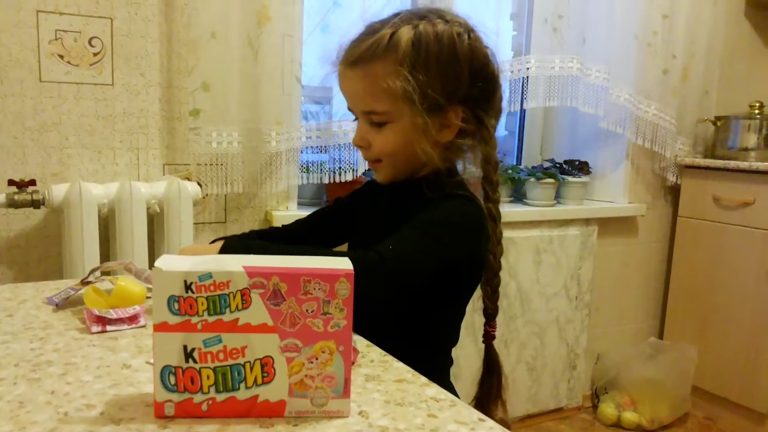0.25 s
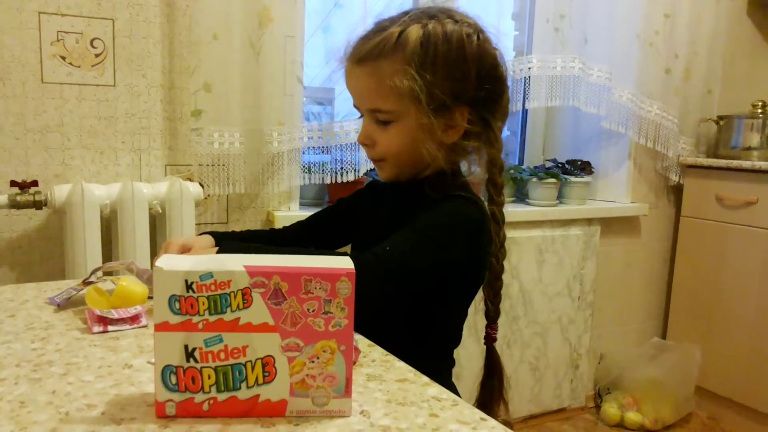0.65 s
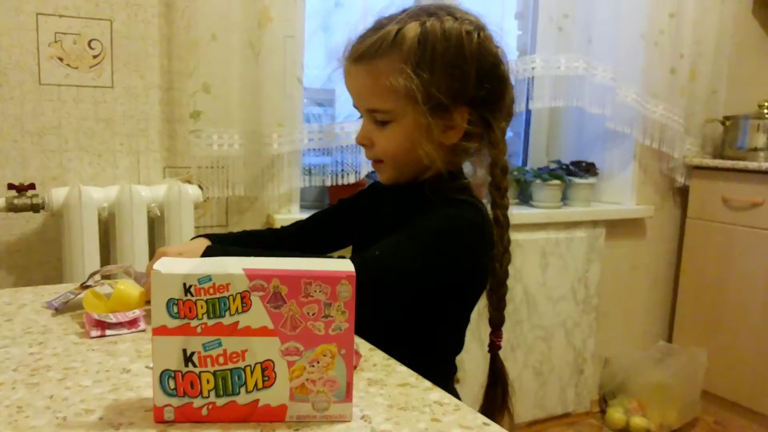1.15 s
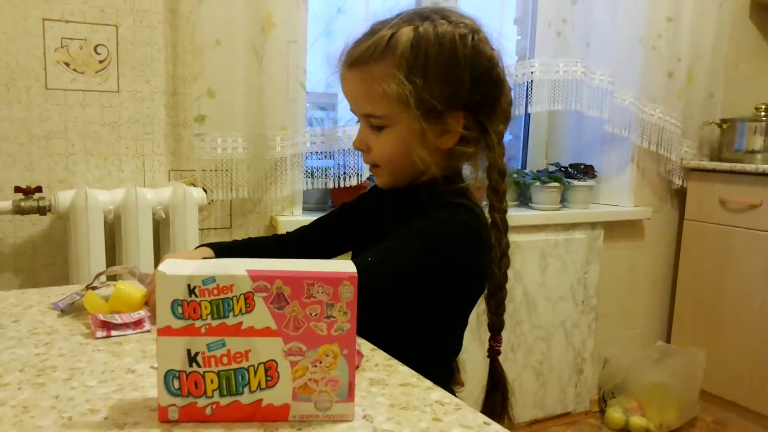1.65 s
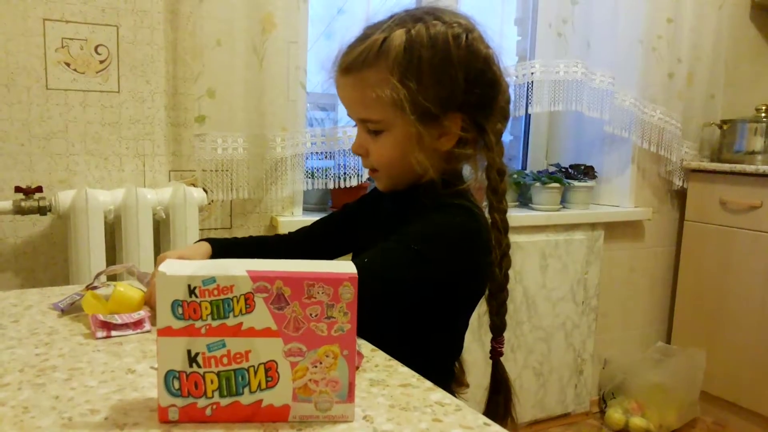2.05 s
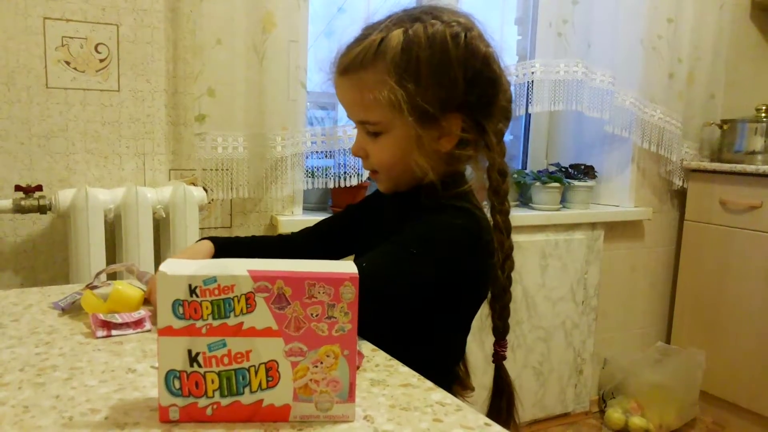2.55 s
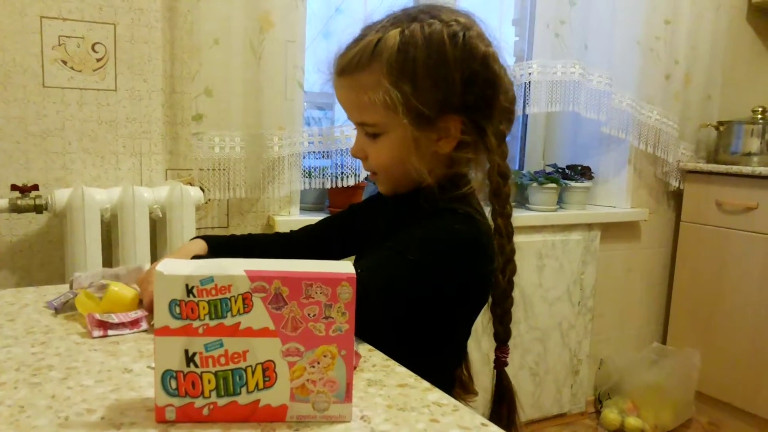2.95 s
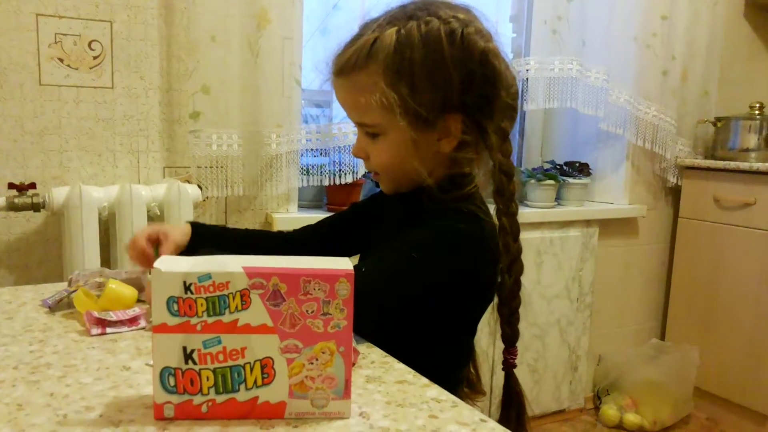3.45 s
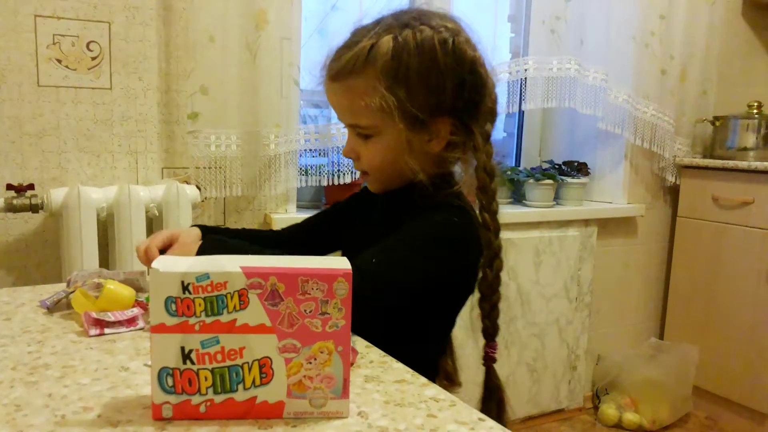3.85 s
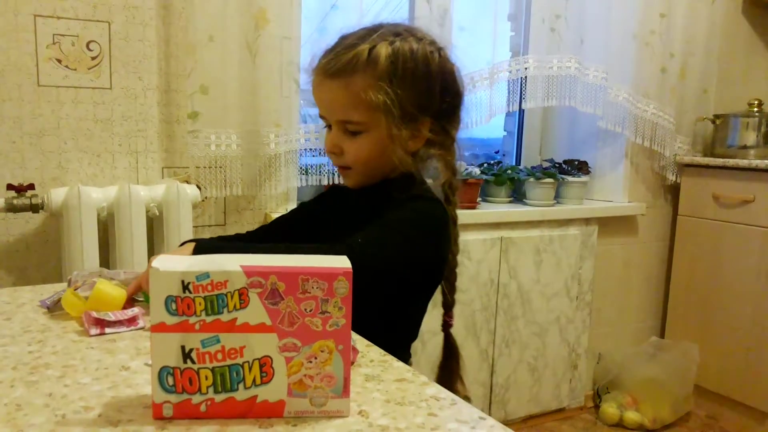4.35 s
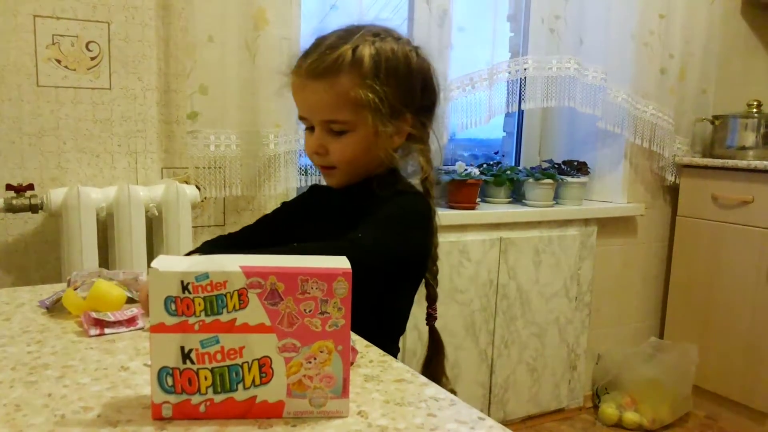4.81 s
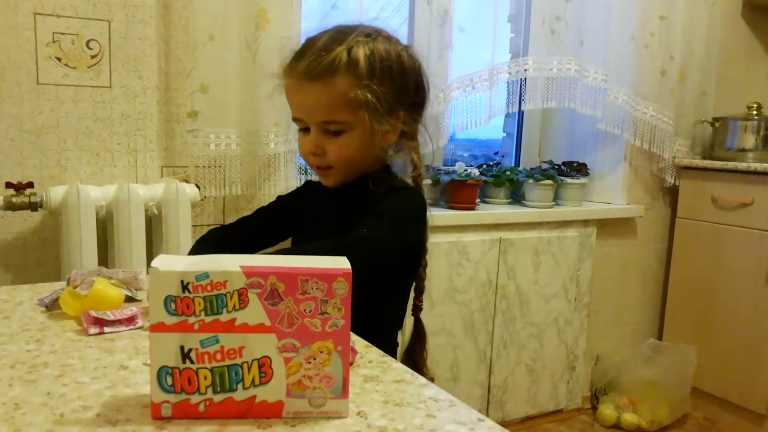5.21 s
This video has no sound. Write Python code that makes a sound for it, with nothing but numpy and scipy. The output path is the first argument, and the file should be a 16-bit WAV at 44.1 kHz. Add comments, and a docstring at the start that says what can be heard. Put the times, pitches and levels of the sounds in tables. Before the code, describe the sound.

In a small, hard kitchen, light hollow plastic toy pieces are turned, knocked together and set down on a table. From 0 to 1 second there are soft, scattered ticks and a faint slide, slightly firmer near 0.45. Clicks around 1.05, 1.5 and 1.8 are clearer, with small rattles and gaps between. A stronger clack comes at 2.3, then denser handling from 2.5 to 3.2. A hard knock at 3.3 leads to the sharpest, brightest cracks near 3.57, followed by quick taps until 3.8. After a short lull, a tight cluster strikes at 4.15 to 4.3, and more clacks at 4.65 to 4.8. Sliding and rattling are fuller around 4.9 to 5.2, then tiny taps end softly near 5.5. Rings are very short, with a brief bright room tail. Quiet hiss and low, wandering rumble continue throughout, the deepest part thinner after 2.7.

```python
"""Small hollow plastic toy pieces are turned, knocked together and set down on a kitchen table.
The first knocks are soft and sparse; they grow louder and denser, are hardest from about 3.3 to 4.8 s,
and end softly. Each knock chatters for a few milliseconds and rings the short modes of the pieces.
Slides and rattles come and go between and under the knocks, made of many tiny contacts with the same modes.
A small hard room answers with dense reflections, over steady hiss and a low, wandering household rumble."""
import sys
import numpy as np
from scipy import signal
from scipy.fft import rfft, irfft
from scipy.io import wavfile

SR = 44100
rng = np.random.default_rng(int(sys.argv[2]) if len(sys.argv) > 2 else 0)


def persist_wave(psi):
    """Save psi, clipped to +-1, as 16-bit WAV."""
    counts = np.round(np.clip(psi, -1, 1) * 32767).astype(np.int16)
    wavfile.write(sys.argv[1], SR, np.atleast_2d(counts).T)


def how_loud(loudness_db):
    """Turn decibels into a plain amplitude multiplier (0 dB gives 1, 20 dB gives 10)."""
    steps = np.asarray(loudness_db, float) / 20
    return 10 ** steps


N = 241529
T = np.arange(N) / SR  # time of every sample, in seconds

# What each part of the pieces rings with when left free, before any detuning or holding:
# (frequency [Hz], strength within the part [dB], time to fall by 60 dB [s])
HOLLOW = [(509.3, 3.5, 0.04), (607, -3, 0.079), (752.3, 2, 0.16)]
SHELL = [(1134, -21.5, 0.11), (1117, 3.5, 0.012), (1342, 2, 0.036), (1442, 13, 0.0036)]
WALL = [(1744, -12, 0.076), (1643, -1.5, 0.046), (1834, 1.5, 0.027)]
RIM = [(2217, 3.5, 0.0063), (2480, -6, 0.014), (2402, -8.5, 0.051), (2777, -1.5, 0.008), (2606, -3, 0.013)]
EDGE = [(3250, -2, .007), (3660, 0, .013), (4230, -3, .009), (4650, -6, .005)]
CRACK = [(5300, -4, .003), (6200, -1, .003), (7200, 1, .0035), (8200, 0, .003), (9400, -5, .002),
         (10800, -7, .0015), (12600, -9, .0015)]
PARTS = SHELL, HOLLOW, WALL, RIM, EDGE, CRACK


def ring(x, hz, t60):
    """One mode: each push in x starts a sine wave that dies away by 60 dB in t60 seconds."""
    pole = np.exp(2j * np.pi * hz / SR - np.log(1000) / (t60 * SR))
    return signal.lfilter([1], [1, -pole], x).imag


def thin(x, modes):
    """Small pieces send out little far below their modes; the finite contact time weakens what lies above."""
    # the first and last listed modes set the band
    band = [0.8 * modes[0][0], 1.3 * modes[-1][0]]
    return signal.sosfilt(signal.butter(2, band, "band", fs=SR, output="sos"), x)


def knocks():
    """A first contact and quick rebounds ring every part; where a knock lands decides each mode's share.
    Row 0 is heard directly; row 1 feeds the room, where the rebounds' comb averages out."""
    # single knocks: (time [s], shell peak [dB], then against the shell: wall [dB], rim [dB], hard crack [dB])
    knock_list = [(0.0736, -40, -7, -11, -18), (0.1174, -39.5, -4, -5, -21), (0.2074, -35.5, 1.5, -5.5, -7),
                  (0.4293, -38, 2.5, -9, -18), (0.4526, -28, 3, 3, -5), (0.605, -33, -1.5, 1, -7),
                  (0.6124, -39, 4.5, 6, 4), (0.7917, -40.5, -9, 0.5, -4), (0.8446, -35.5, -3, -8, -18),
                  (0.8775, -30, -2.5, -1.5, -7.5), (0.939, -34.5, -1.5, -11, -23), (1.038, -29, -9, 2, 0),
                  (1.063, -23.5, -8, -12, -11), (1.4825, -26.5, -12, -2.5, -2.5), (1.7557, -37, -5, 2, -24),
                  (1.8158, -24.5, -20, -8.5, -1.5), (1.8284, -38, 0, -7, -3), (1.936, -31, -14, -2, -18),
                  (1.952, -32, -4, -1, -23), (2.2683, -24.5, -7, 0.5, -19), (2.3052, -17.5, -13, -1.5, -9),
                  (2.3164, -32.5, -6, -14, 11), (2.5319, -34.5, -6, -4, -13), (2.597, -38.5, -4, -17, -20),
                  (2.6595, -25.5, -2, -8, -19), (2.7062, -29, -22, -5, -10), (2.817, -43.5, -9, 1, -6),
                  (2.876, -28.5, -9, -11.5, -9), (2.9128, -26, -7, 5.5, -3.5), (3.033, -34, -3, -9, -9),
                  (3.054, -30, -9, -1.5, -7), (3.0985, -36.5, -8, 4, 6.5), (3.1258, -28.5, -22, -15, -8.5),
                  (3.1449, -23, -18, -4, -8), (3.2874, -16.5, -5, 0.5, -5), (3.3215, -27.5, -6, 0, -0.5),
                  (3.3478, -21.5, -21, -1, -4), (3.3892, -28.5, -12, -16, -23), (3.4301, -32, -19, -1, -10),
                  (3.5054, -49, -17, 0, 22.5), (3.5633, -13.5, -15, 6.5, 8), (3.5698, -10.5, -7, -10, 8),
                  (3.6466, -21, -20, 3.5, -3), (3.695, -29, -23, 5, -11), (3.7222, -20, -5, -1.5, 0),
                  (3.7698, -26.5, 0, 3.5, -7), (3.7964, -33.5, 7.5, 4.5, 5), (4.1543, -15.5, -21, 5, 1.5),
                  (4.1927, -19.5, -22, -9, 2.5), (4.2322, -20, -10, -2, 1), (4.242, -15, -1.5, 3, 3.5),
                  (4.2777, -24.5, -19, 2, -12), (4.4214, -36, -4, -1, -49), (4.4657, -23, -14, -45, -31),
                  (4.6537, -26.5, -24, -4, -27), (4.7023, -22, 2.5, 3.5, 0.5), (4.742, -26, 2, 3, -2),
                  (4.7664, -16.5, -2.5, 3, -1), (4.802, -28.5, 7, 2, -8), (4.8181, -25, -12, 3.5, 1),
                  (4.929, -25, -4, -9, -19), (5.01, -20.5, -11, 3.5, -7), (5.1226, -25.5, -16, 4.5, 2),
                  (5.1662, -24.5, -18, -27, -10), (5.1919, -23, 1, 1, -7), (5.294, -35.5, 5, 2, -19),
                  (5.3084, -43, -14, 7, -11), (5.35, -37.5, -24, 5.5, -21), (5.3961, -35, -21, 8, -22),
                  (5.4552, -36, 7.5, 0, -7), (5.4674, -36, -10, 1, -22)]
    chatter_s = 0.0035  # the rebounds fall within this time
    hollow_db, edge_offset_db = -19.5, -1.5
    landing_db, detune = 2.5, 0.025  # random spread of mode strength, and of pitch as a fraction
    grip = 0.65  # fingers hold a knocked piece and shorten its ring to this fraction
    span = SR // 8  # samples kept for one knock
    out = np.zeros((2, N + SR))
    for s, db, wall_db, rim_db, crack_db in knock_list:
        touch = np.zeros((2, span))
        delays = np.r_[0, chatter_s * rng.random(11)]
        signs = rng.choice([-1, 1], 12)
        sizes = how_loud(-5 * rng.random(12)) * np.exp(-delays / chatter_s)
        np.add.at(touch[0], (delays * SR).astype(int), signs * sizes)
        touch[1, 0] = 1
        start = int(s * SR)
        edge_db = edge_offset_db + (rim_db + crack_db) / 2  # the edge lies between rim and crack
        shares_db = [0, hollow_db, wall_db, rim_db, edge_db, crack_db]
        for modes, part_db in zip(PARTS, shares_db):
            sound = 0
            for hz, mode_db, t60 in modes:
                strength = how_loud(mode_db + landing_db * rng.standard_normal())
                pitch = hz * (1 + detune * rng.standard_normal())
                sound = sound + strength * ring(touch, pitch, grip * t60)
            sound = thin(sound, modes)
            # give the room's copy as much energy as the direct one
            sound[1] *= np.linalg.norm(sound[0]) / np.linalg.norm(sound[1])
            out[:, start:start + span] += how_loud(db + part_db) * sound / np.abs(sound[0]).max()
    return out[:, :N]


def swell(s, length):
    """Pressure that rises and falls smoothly once, like half a sine wave."""
    return np.sin(np.pi * np.clip((T - s) / length, 0, 1))


def slides():
    """While a piece slides or rolls, many tiny uneven contacts excite the modes as pressure swells and fades."""
    # slides: (start [s], length [s], shell level [dB], rim against shell [dB], hard crack against shell [dB])
    slide_list = [(0.065, 0.32, -66.5, -3, -25), (0.414, 0.019, -37, -9, -36), (0.472, 0.098, -59, -1, -16),
                  (0.832, .26, -53.5, -4, -15), (1.033, 0.038, -51.5, 5.5, 0.5),
                  (1.212, 0.065, -60, -7, -23), (1.308, 0.11, -59, -9.5, -26), (1.73, 0.15, -49.5, -7, -15),
                  (1.901, 0.12, -42.5, -6, -20), (2.272, 0.13, -53.5, 2.5, -8),
                  (2.501, 0.18, -56.5, -5, -13), (2.677, 0.055, -39.5, -4, -16.5),
                  (2.745, 0.12, -51.5, -9, -15), (2.86, 0.05, -38, -12, -23), (2.888, 0.13, -52, 3, -13.5),
                  (3, 0.27, -52, 5.5, -13), (3.26, 0.16, -46.5, 3, -12), (3.394, 0.19, -65.5, 10.5, 12),
                  (3.577, .26, -47.5, 4, -1), (4.154, 0.075, -43.5, 7, -3), (4.235, .13, -38.5, -6, -11.5),
                  (4.287, 0.072, -30.5, -4, -47), (4.414, 0.038, -42.5, -7, -35),
                  (4.447, 0.072, -32.5, -5.5, -19.5), (4.529, 0.08, -57, -5, -22),
                  (4.622, 0.056, -51.5, 8, -7), (4.779, .1, -44.5, 1.5, -18),
                  (4.855, 0.18, -39.5, -5.5, -18.5), (4.966, 0.16, -34.5, -4, -16),
                  (5.055, 0.2, -36.5, -2.5, -10), (5.281, 0.094, -49.5, -1, -9),
                  (5.348, 0.13, -43.5, -2.5, -12.5)]
    # soft bumps and drags that sound only the hollow: (start [s], length [s], level [dB])
    bump_list = [(0.436, 0.025, -55), (0.509, 0.0098, -45), (0.684, 0.013, -53), (0.94, 0.067, -64),
                 (1.22, 0.064, -57.5), (1.31, 0.11, -57.5), (2.74, 0.22, -60), (4.652, .015, -42.5)]
    contact_rate, spread_db = 1400, 3.8  # average contacts per second; how uneven they are
    wall_offset_db, edge_offset_db = -5, -6.5  # both against the rim
    turn_s, turn_db = 0.025, 2  # a rolling piece offers another part this often; spread of each part's share
    contacts = rng.random(N) < contact_rate / SR
    sizes = contacts * how_loud(spread_db * np.minimum(rng.exponential(size=N), 3.5))

    pressure = np.zeros((len(PARTS), N))
    for s, length, db, rim_db, crack_db in slide_list:
        # the hollow's share is -12 dB in a slide of -42 dB and falls as the slide gets firmer
        hollow_db = -12 - 0.55 * (db + 42)
        shares_db = [0, hollow_db, rim_db + wall_offset_db, rim_db, rim_db + edge_offset_db, crack_db]
        pressure += swell(s, length) * how_loud(db + np.array(shares_db)[:, None])
    turns = rng.standard_normal((len(PARTS), 1000))
    pressure *= [how_loud(turn_db * np.interp(T / turn_s, np.arange(len(turn)), turn)) for turn in turns]
    for s, length, db in bump_list:
        pressure[1] += swell(s, length) * how_loud(db)  # row 1 is the hollow

    out = 0
    for modes, press in zip(PARTS, pressure):
        sound, power = 0, 0
        for hz, mode_db, t60 in modes:
            # ringing under constant pressure gives the part's reference loudness
            power += np.mean((how_loud(mode_db) * ring(sizes, hz, t60)) ** 2)
            pushes = sizes * press * rng.standard_normal(N)
            sound = sound + how_loud(mode_db) * ring(pushes, hz, t60)
        out = out + thin(sound, modes) / np.sqrt(power)
    return out


def room(x):
    """Dense reflections start after a short gap and die away at a speed that depends on the pitch."""
    # how long the room rings: (frequency [Hz], time to fall by 60 dB [s])
    room_decay = [(400, 0.43), (1300, 0.22), (3500, 0.34), (9000, 0.2), (15000, 0.13)]
    room_db, gap_s = -6, 0.004
    t = T[:SR // 2]
    hz, t60 = np.transpose(room_decay)
    tail = 0
    for low in 200 * 2 ** np.arange(0, 6.5, 0.5):  # half-octave bands
        band_filter = signal.butter(2, [low, low * np.sqrt(2)], "band", fs=SR, output="sos")
        band = signal.sosfilt(band_filter, rng.standard_normal(len(t)))
        band_t60 = np.interp(np.log(low), np.log(hz), t60)
        tail = tail + band * how_loud(-60 * t / band_t60)
    tail = tail * np.clip(t / gap_s - 1, 0, 1)  # silent during the gap, then fades in over as long again
    tail = how_loud(room_db) * tail / np.sqrt(np.sum(tail ** 2))
    return signal.fftconvolve(x, tail)[:N]


def level(x, db):
    """Scale a sound to a chosen average (rms) level."""
    return x * how_loud(db) / np.sqrt(np.mean(x ** 2))


def coloured(points):
    """Noise whose spectrum follows a curve of (frequency [Hz], level [dB]) points."""
    hz, db = np.transpose(points)
    bins = np.maximum(np.fft.rfftfreq(N, 1 / SR), 1)
    curve = how_loud(np.interp(np.log(bins), np.log(hz), db))
    return irfft(rfft(rng.standard_normal(N)) * curve, N)


def low_part(x, hz):
    """Keep only what lies below hz, without delaying it."""
    return signal.sosfiltfilt(signal.butter(2, hz, fs=SR, output="sos"), x)


def floor():
    """Steady hiss; the rumble under it wanders, and its deepest part drops halfway and slowly returns."""
    # spectrum of the quiet background: (frequency [Hz], relative level [dB])
    quiet_curve = [(15, -61), (35, -20.5), (123, -6), (175, -1.5), (256, -4), (301, -4.5), (416, -9),
                   (451, -11), (677, -12), (2760, -20.5), (3430, -22.5), (6050, -29), (9840, -24.5),
                   (16000, -21)]
    # level change of the deepest rumble: (time [s], level [dB])
    deep_curve = [(0, 3.5), (2.4, 3.5), (2.7, -3.5), (5.48, 3.5)]
    wander_db, wander_s = 3, 0.39  # spread of the rumble's level, and time between its random values
    noise = level(coloured(quiet_curve), -57)
    rumble = low_part(noise, 343)
    deep = low_part(noise, 107)
    hiss = noise - rumble
    knots = np.arange(0, T[-1] + 1, wander_s)
    wander = how_loud(wander_db * np.interp(T, knots, rng.standard_normal(len(knots))))
    deep_gain = how_loud(np.interp(T, *np.transpose(deep_curve)))
    return hiss + wander * (rumble - deep + deep * deep_gain)


def scene():
    """The toys, their room and the quiet floor; a box in front shades the direct treble but not the room's."""
    shade_hz, shade_db = 5100, -6
    near, spread = knocks() + slides()
    dull = signal.sosfilt(signal.butter(1, shade_hz, fs=SR, output="sos"), near)
    shaded = dull + how_loud(shade_db) * (near - dull)
    return (shaded + room(spread) + floor())[None]


def top_cut(x):
    """Nothing passes above the cut-off."""
    return signal.sosfilt(signal.butter(12, 16970, fs=SR, output="sos"), x)


def record(dry):
    """A slow gain control turns the sound down during and after loud moments; the top is cut."""
    duck_at_db, duck_slope, duck_s = -38, 0.13, 0.8  # level where it sets in, strength, memory in seconds
    top_hz = 15650
    keep = np.exp(-1 / (duck_s * SR))
    power = signal.lfilter([1 - keep], [1, -keep], dry ** 2)
    held = dry * (1 + power / how_loud(duck_at_db) ** 2) ** -duck_slope
    cut = signal.sosfilt(signal.ellip(8, 0.2, 30, top_hz, fs=SR, output="sos"), held)
    return top_cut(cut)


dry = scene()
out = record(dry)
persist_wave(out)
```